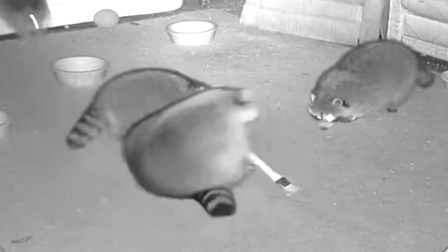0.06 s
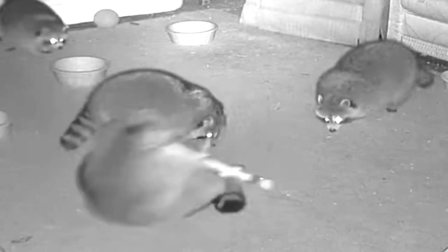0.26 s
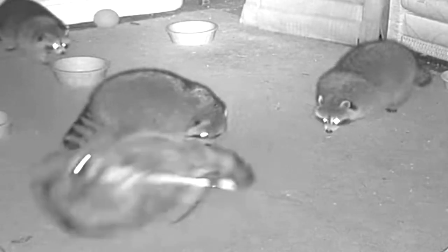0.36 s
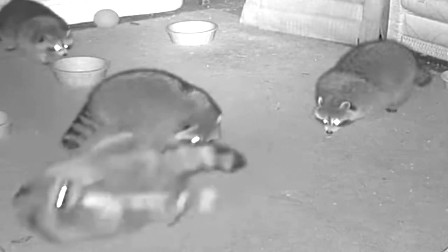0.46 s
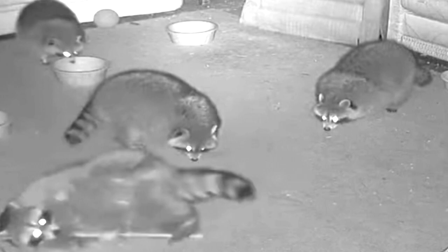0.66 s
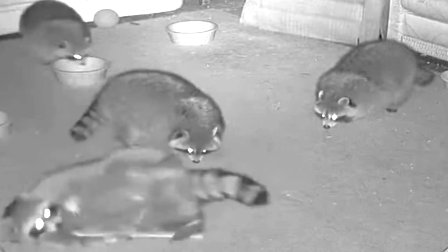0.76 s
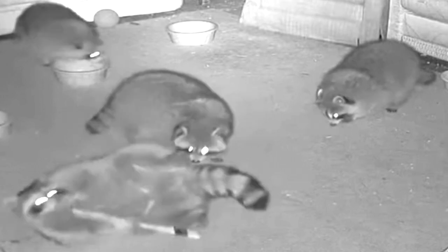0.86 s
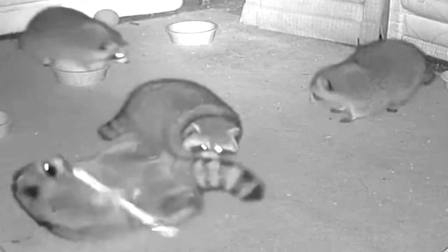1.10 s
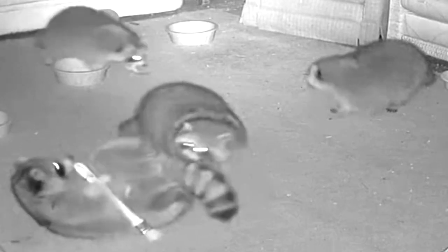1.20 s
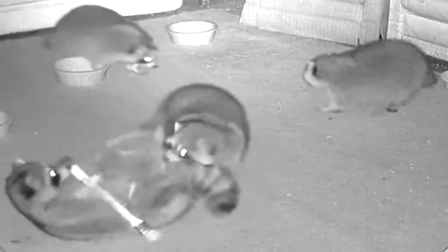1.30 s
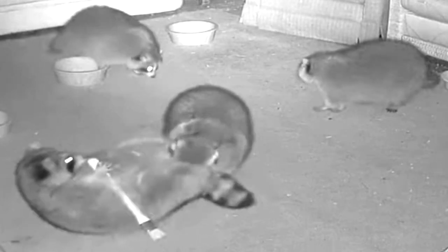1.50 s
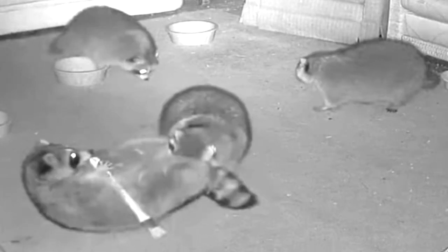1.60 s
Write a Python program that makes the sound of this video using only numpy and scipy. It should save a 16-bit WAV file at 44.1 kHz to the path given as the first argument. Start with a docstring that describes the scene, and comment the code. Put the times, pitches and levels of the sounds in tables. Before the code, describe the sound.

A raccoon rolls over on a hard floor, its fur and paws scuffing softly through the first half second. A dry pop and a soft bump come near 0.2 seconds, just before a paintbrush handle clacks down brightly, the loudest sound. A hollow knock follows at 0.6 seconds. Claws and handle tick lightly around 1.05 and 1.6 seconds, with faint scuffs. Steady microphone hiss fills the small room.

```python
"""Raccoon rolling over with a paintbrush

Fur and paws scuff a hard indoor floor in grainy strokes, the body lands softly with a dry pop just ahead
of it, and the brush handle clacks down with a short, bright ring. A hollow knock follows, then claws and
handle tick lightly while the animal lies on its back. A tight room and microphone hiss sit behind it."""
import sys
import numpy as np
from scipy import signal
from scipy.fft import rfft, irfft
from scipy.io import wavfile

SR = 44100
rng = np.random.default_rng(int(sys.argv[2]) if len(sys.argv) > 2 else 0)


def output_pcm(signal):
    """Save a mono or channel-first signal as 16-bit PCM at the path in sys.argv[1].

    Samples are clipped to [-1, 1] before scaling.
    """
    pcm = np.clip(np.atleast_2d(signal).T, -1, 1) * 32767
    wavfile.write(sys.argv[1], SR, np.round(pcm).astype(np.int16))


N = 72765
T = np.arange(N) / SR

# hard hits of handle and claws: t/s, level/dB, pitch/ratio, ring length/ratio
CLACK_HITS = [(.258, -9.4, 1.002, 0.8), (0.5141, -33, 1.04, 0.58), (0.6294, -40, 0.93, 0.53),
              (1.0524, -33, 1.025, 1), (1.0592, -35, 1.025, 0.59), (1.602, -32.5, 1, 2.2),
              (1.606, -33.5, 1, 1), (1.6257, -38.5, 1.09, 0.47)]
# their ring, before each hit's ratios: f/Hz, level/dB, t60/s
CLACK_MODES = [(4035, -23, .04), (4405, -16, .05), (4665, -3.5, .038), (4850, 3, 0.016),
               (5075, -5.5, 0.041), (5400, 3.5, 0.026), (5630, -6, 0.028), (6025, -7, .04),
               (6260, -7, .052), (7388, -13.5, 0.02), (7980, -25, .05), (8280, -10.5, 0.013)]
# EQ of the noisy crack: f/Hz, level/dB
CRACK_EQ = [(300, -42), (2000, -13), (3700, -18), (4500, -6), (5500, 1.5), (6300, -5), (6900, -3),
            (8400, -9.5), (10000, -21.5), (11000, -24), (12000, -44), (15000, -46)]

def clacks():
    """Handle and claws strike with a ring and a crack; a thin, bright overload spit tops the loudest."""
    crack = colour(rng.standard_normal(N), CRACK_EQ)
    rise_s, spit_delay_s = .00086, .0006
    hits, spit = np.zeros(N), np.zeros(N)
    for s, db, pitch, length in CLACK_HITS:
        modes = [(hz * pitch, level, t60 * length) for hz, level, t60 in CLACK_MODES]
        burst = amp(-19.5) * crack * onset(s, rise_s) * decay(s, t60=.057 * length)
        hits += amp(db) * (ring(s, rise_s, modes) + burst)
        spit[round((s + spit_delay_s) * SR)] = amp(-13) * amp(db) ** 2  # only heard on the loudest
    return hits + high_pass(spit, hz=11000)


# dull blows: t/s, level/dB, rise/s, tilt/(dB per octave), ring length/ratio
KNOCK_HITS = [(0.6325, -23, 0.00115, 10, 1.42), (.6359, -27.5, .0025, -4.5, .4)]
# their hollow ring, before each blow's tilt and length: f/Hz, level/dB, t60/s
KNOCK_MODES = [(184, -3.5, .036), (273.5, -12, .094), (364, -13, .049), (417, 3, 0.076), (526, 4.5, 0.042),
               (679, 6, 0.027), (763, -2.5, .053), (846, -1, 0.016), (1153, -17, 0.022),
               (1390, -17.5, 0.036), (2130, -36.5, 0.041)]

def knock():
    """A hard contact, then a short, dull one: a hollow knock with its own room tail and no deep bass."""
    blows = np.zeros(N)
    for s, db, rise, tilt, length in KNOCK_HITS:
        modes = [(hz, level + tilt * np.log2(hz), t60 * length) for hz, level, t60 in KNOCK_MODES]
        blows += amp(db) * ring(s, rise, modes)
    return high_pass(blows + amp(-22) * room(blows, t60=.14), hz=222)


# soft landings: t/s, f/Hz, level/dB, rise/s, t60/s
BODY_BUMPS = [(.13, 1014, -49.5, 0.014, 0.055), (.131, 746, -54, 0.0071, .07),
              (.2448, 843, -27.5, 0.006, 0.033), (.262, 347.5, -43, 0.0059, 0.055),
              (.339, 784, -51, 0.0082, 0.069), (.623, 770, -46, .006, 0.025),
              (1.085, 337, -65, 0.0043, 0.043)]

def bumps():
    """Body and paws land, each ringing one note with a cushioned attack."""
    return swells(BODY_BUMPS)


def pop(s=.2165, hz=624):
    """One dry pop: a sharp edge and a quickly damped swing, thin in the bass."""
    edge = np.exp(-((T - s) / .00006) ** 2)
    swing = decay(s, t60=.0047) * np.sin(2 * np.pi * hz * since(s))
    low_cut = signal.butter(1, 300, "high", fs=SR)
    return signal.lfilter(*low_cut, amp(-22) * swing - amp(-21.5) * edge)


# strokes of fur and paws: peak t/s, level/dB, rise/s, t60/s, hollow mix/dB, body mix/dB
SCUFF_STROKES = [(0.021, -47.5, .006, 0.046, -24, -20.5), (0.069, -48, 0.0078, 0.071, -29, -35),
                 (.141, -42.5, 0.018, 0.068, -5.5, -25), (.186, -53, 0.0085, 0.052, 11, 4.5),
                 (.196, -35, 0.0074, 0.051, -14, -5.5), (.206, -52, .004, .06, -11, 4.5),
                 (0.252, -41.5, 0.011, 0.053, -3.5, -1.5), (.268, -49.5, .008, .16, -2, 5.5),
                 (.337, -33.5, .004, 0.046, -21, -30), (0.351, -42, 0.0092, 0.068, -10.5, -30),
                 (0.441, -49.5, .012, 0.063, -16, -25.5), (0.512, -54, .008, 0.039, -28, -26),
                 (.581, -51, .006, 0.068, -35, -33), (.754, -47.5, 0.0078, 0.038, -14.5, -37),
                 (0.779, -54, 0.0036, .04, -16, -35), (.948, -51, 0.0067, 0.062, -17, -21),
                 (0.977, -53, .004, 0.048, -20, -30), (1.019, -52, .006, 0.04, -37, -39),
                 (1.502, -49, 0.013, .07, -35, -32), (1.609, -48.5, 0.0045, .05, -35, -36),
                 (1.631, -58, 0.0091, 0.086, -22, -31)]
# EQs of a stroke's three layers: f/Hz, level/dB
GRIT_EQ = [(150, -58), (500, -38), (1800, -26.5), (2700, -5.5), (4000, -5), (5500, 3), (6300, -4.5),
           (7200, -11), (9000, -28.5), (13000, -44), (15000, -72)]
HOLLOW_EQ = [(120, -65), (250, -26), (600, -11), (770, -2), (880, -10.5), (1040, -2), (1220, -5),
             (1400, -9.5), (1750, -4.5), (2200, -12.5), (5000, -50)]
BODY_EQ = [(25, -19), (60, -22), (150, -25), (240, -14), (330, 6), (420, -2.5), (560, 1), (1000, -7),
           (1800, -13.5), (3000, -8), (6000, -53)]

def scuffs():
    """Fur and paws rub the floor: bright grit, a hollow ring, and low body where weight presses."""
    grit, hollow, body = (colour(grains(), eq) for eq in (GRIT_EQ, HOLLOW_EQ, BODY_EQ))
    strokes = np.zeros(N)
    for s, db, rise, t60, hollow_db, body_db in SCUFF_STROKES:
        attack = np.exp(-2 * np.maximum(s - T, 0) / rise)
        texture = grit + amp(hollow_db) * hollow + amp(body_db) * body
        strokes += amp(db) * attack * decay(s, t60) * texture
    return strokes


# small high notes: t/s, f/Hz, level/dB, rise/s, t60/s
SQUEAK_NOTES = [(1.495, 2500, -48, 0.0055, 0.03), (1.499, 5700, -49.5, 0.0036, 0.057),
                (1.51, 2500, -53, .005, 0.049), (1.57, 4930, -51, .003, .03),
                (1.602, 2790, -49.5, 0.0048, 0.019), (1.602, 3280, -49, 0.0036, .04)]

def squeaks():
    """Faint, thin pings and squeaks near the end."""
    return swells(SQUEAK_NOTES)


# fader rides of the fur and the rumble: t/s, level/dB
FUR_RIDE = [(0, -58.5), (.12, -62), (.23, -50), (.29, -53.5), (.33, -49.5), (.39, -53.5), (.48, -59),
            (.6, -57), (.8, -65), (1.06, -62.5), (1.17, -58), (1.25, -79), (1.45, -65.5), (1.65, -56)]
RUMBLE_RIDE = [(0, -78), (.06, -88), (.15, -84), (.19, -74), (.26, -74), (.31, -70), (.37, -86), (.5, -115)]
# their EQs: f/Hz, level/dB
FUR_EQ = [(150, -49), (400, -24), (900, -18), (3000, -14.5), (4500, -7), (6100, -3.5), (7000, -21),
          (12000, -36), (15000, -63)]
RUMBLE_EQ = [(15, -11), (28, -5), (60, -7), (120, -22), (200, -4), (500, -24), (2000, -60)]

def slide():
    """Sliding fur rustles over a faint rumble as the body rolls and settles."""
    rumble = fader(RUMBLE_RIDE) * colour(rng.standard_normal(N), RUMBLE_EQ)
    rustle = fader(FUR_RIDE) * colour(grains(), FUR_EQ)
    return rustle + rumble


def room(x, t60):
    """Sparse reflections make a short tail after a pre-delay."""
    reflections_per_s, pre_delay_s = 3000, .0068
    taps = rng.choice([-1, 1], N) * (rng.random(N) < reflections_per_s / SR)
    tail = taps * (T > pre_delay_s) * decay(0, t60)
    return signal.fftconvolve(x, tail / np.linalg.norm(tail))[:N]


# EQ of the noise floor: f/Hz, level/dB
HISS_EQ = [(15, -24), (25, -14), (55, -28), (100, -41), (150, -39), (210, -29), (380, -18), (550, -14.5),
           (850, -6.5), (1050, -6), (1400, -5.5), (3100, -4), (5300, -5), (7800, -10.5), (10000, -18.5),
           (13300, -31.5), (14500, -56)]

def hiss():
    """A small microphone's steady bed of hiss."""
    return amp(-58) * colour(rng.standard_normal(N), HISS_EQ)


def amp(db):
    """Decibels to gain."""
    return 10 ** (np.asarray(db) / 20)


def fader(ride):
    """Gain that glides between (t/s, level/dB) points."""
    return amp(np.interp(T, *np.transpose(ride)))


def colour(x, eq):
    """Shapes x with an EQ drawn on a log-frequency axis, at rms 1."""
    hz, db = np.transpose(eq)
    f = np.fft.rfftfreq(N, 1 / SR)
    gain = amp(np.interp(np.log(f + 1), np.log(hz + 1), db))
    shaped = irfft(rfft(x) * gain, N)
    return shaped / np.sqrt(np.mean(shaped ** 2) + 1e-20)


def high_pass(x, hz):
    """Steep low cut."""
    return signal.sosfilt(signal.butter(6, hz, "high", fs=SR, output="sos"), x)


def since(s):
    """Seconds since s, zero before."""
    return np.maximum(T - s, 0)


def decay(s, t60):
    """Holds 1 until s, then falls 60 dB every t60."""
    return np.exp(-np.log(1000) * since(s) / t60)


def onset(s, rise):
    """Smooth attack from 0 to 1."""
    return np.sin(np.pi / 2 * np.minimum(since(s) / rise, 1)) ** 2


def ring(s, rise, modes):
    """Damped modes struck together at s, with a peak of 1."""
    partials = sum(amp(db) * decay(s, t60) * np.sin(2 * np.pi * hz * since(s)) for hz, db, t60 in modes)
    struck = onset(s, rise) * partials
    return struck / (abs(struck).max() + 1e-12)


def swells(notes):
    """Single resonances that swell and die away."""
    return sum(amp(db) * onset(s, rise) * decay(s + rise, t60) * np.sin(2 * np.pi * hz * since(s))
               for s, hz, db, rise, t60 in notes)


def grains(per_s=7000, spread_db=3):
    """Dense friction clicks of uneven size."""
    size = amp(spread_db * np.minimum(rng.exponential(1, N), 4))
    return size * rng.choice([-1, 1], N) * (rng.random(N) < per_s / SR)


def scene():
    """Mono mix: the tumble with its room send, the knock and the pop, over hiss."""
    tumble = clacks() + bumps() + scuffs() + squeaks() + slide()
    bed = hiss()
    reverb = amp(-18.5) * room(tumble, t60=.12)
    return (tumble + reverb + knock() + pop() + bed)[None]


def record(dry):
    """A steep high cut takes off the very top."""
    high_cut = signal.firwin(511, 16500, window=("kaiser", 9), fs=SR)
    return signal.oaconvolve(dry, high_cut[None], "same")


dry = scene()
out = record(dry)
output_pcm(out)
```